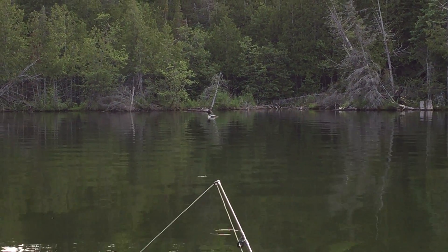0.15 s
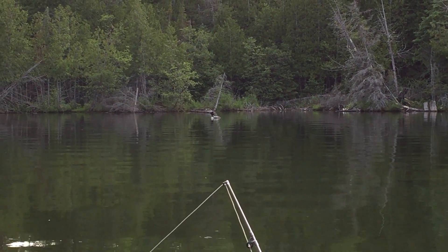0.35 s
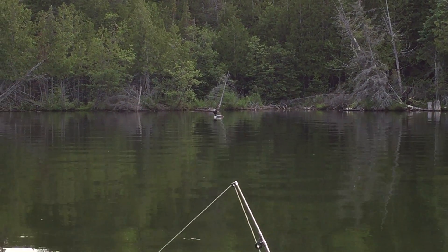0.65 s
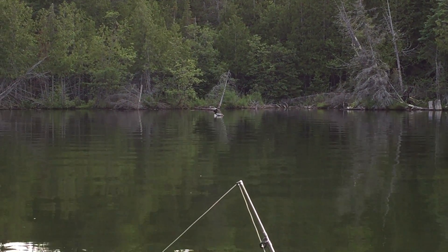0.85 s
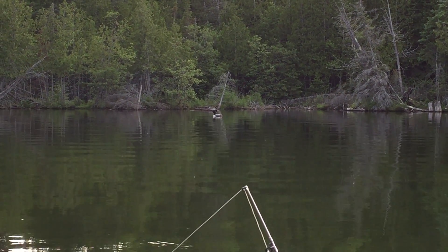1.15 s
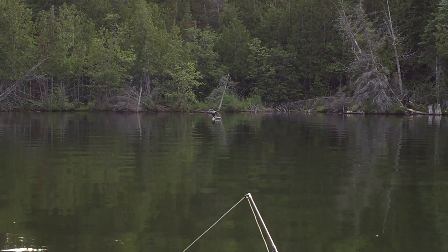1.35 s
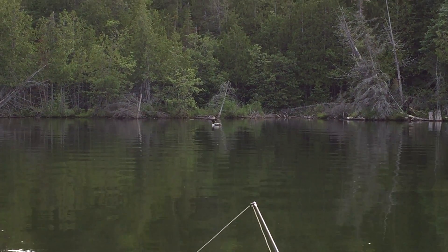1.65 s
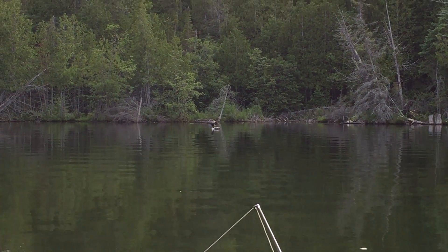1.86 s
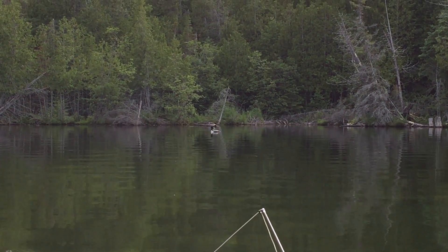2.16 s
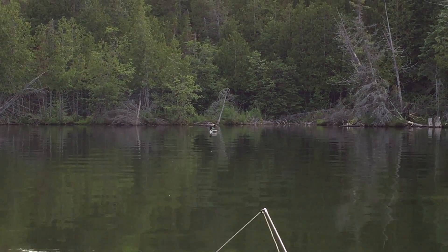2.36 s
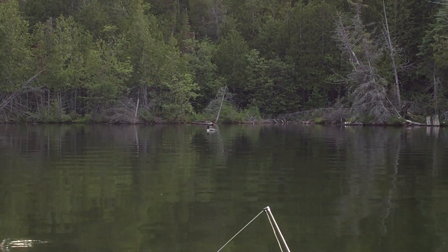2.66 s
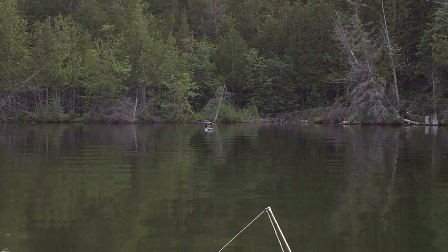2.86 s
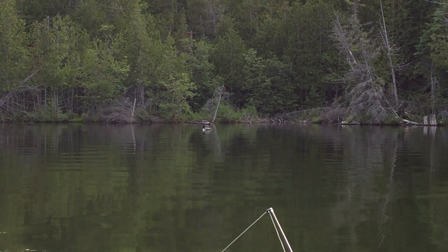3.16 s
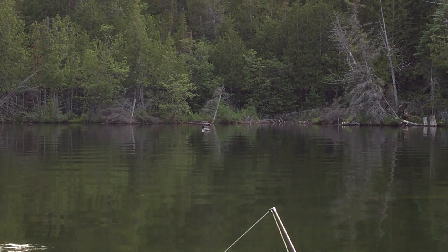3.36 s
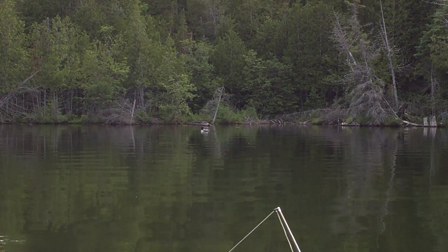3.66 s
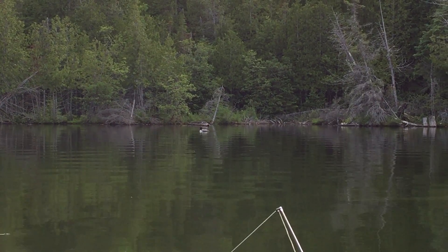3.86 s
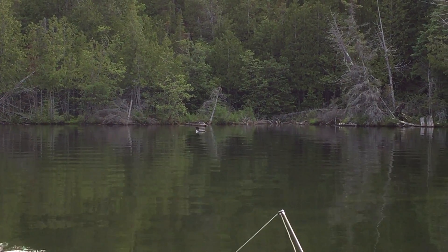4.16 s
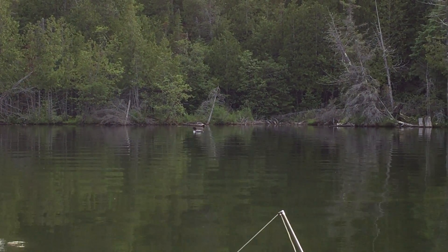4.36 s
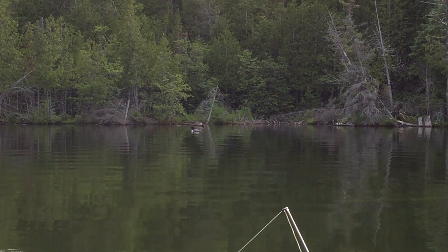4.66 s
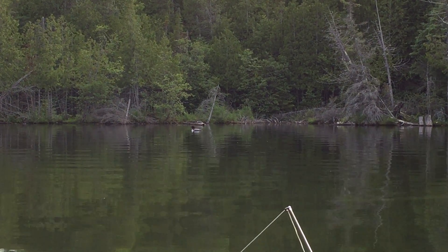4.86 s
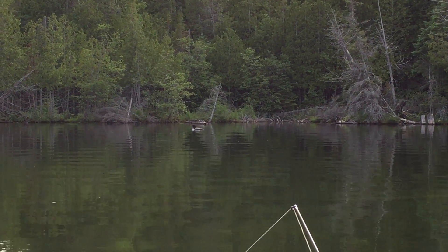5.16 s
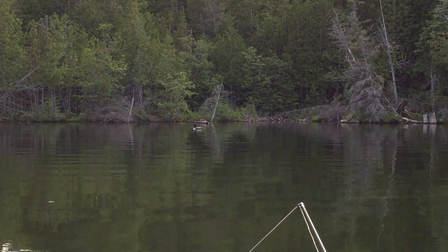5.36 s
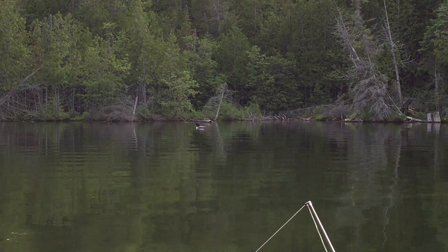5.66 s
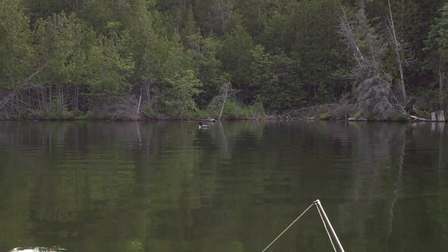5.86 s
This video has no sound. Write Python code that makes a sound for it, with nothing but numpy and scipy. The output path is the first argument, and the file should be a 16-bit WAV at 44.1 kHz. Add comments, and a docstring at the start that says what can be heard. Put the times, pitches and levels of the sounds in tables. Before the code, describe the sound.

A loon far across a still lake gives a half-second, five-pulse tremolo cry at once, its voice flipping between reedy and pure. Woods return a blurred echo. After a pause, a faint hoot and creak lead into a second, rougher cry. Later a small songbird whistles a quick, high see-saw phrase. The microphone is outdoors near the water, with low rumble, soft hiss and two tiny close ticks.

```python
"""Loon tremolo across a still lake

A loon gives two tremolo cries from far across the water, a soft hoot and a creak leading into the second.
Its voice is a stack of harmonics that flips between a low, reedy register and a high, pure one.
The wooded shore throws the cries back as scattered copies; a far shore answers faintly about a second later.
A small songbird whistles one see-saw phrase of sliding tones, with its own short echo in the trees.
Two faint ticks sound close by; under it all lie shaped noise as low rumble and soft hiss, and a faint hum.
"""
import sys
import numpy as np
from scipy import signal
from scipy.fft import rfft, irfft
from scipy.io import wavfile
from scipy.ndimage import uniform_filter1d

SR = 44100
rng = np.random.default_rng(int(sys.argv[2]) if len(sys.argv) > 2 else 0)


def wav_record(signal):
    """Record a signal, one row per channel, as 16-bit PCM in the file named by sys.argv[1]."""
    frames = np.transpose(np.atleast_2d(signal))
    bounded = np.clip(frames, -1, 1)
    # unit amplitude maps onto the largest positive 16-bit level
    quanta = np.round(bounded * 32767).astype(np.int16)
    wavfile.write(sys.argv[1], SR, quanta)


N = 264600
TIME = np.arange(N) / SR
LOW, MIDDLE, HIGH = range(3)  # the loon's registers


def undb(db):
    """Decibels to gain."""
    return 10 ** (np.asarray(db) / 20)


def unit(x):
    """Scale to rms 1."""
    return x / np.sqrt(np.mean(x ** 2))


def spectrum_gain(hz, points):
    """Gain at the given frequencies, from (Hz, dB) points joined along a log frequency axis."""
    at, db = np.transpose(points)
    return undb(np.interp(np.log(np.maximum(hz, 1)), np.log(at), db))


def colour(x, points):
    """Filter by a (Hz, dB) spectrum."""
    return irfft(rfft(x) * spectrum_gain(np.fft.rfftfreq(len(x), 1 / SR), points), len(x))


def walk(rate):
    """Random levels held 1 / rate s and slewed twice; spread 1."""
    hold = max(int(SR / rate), 1)
    steps = np.repeat(rng.standard_normal(N // hold + 1), hold)
    slewed = uniform_filter1d(uniform_filter1d(steps, hold), hold)
    return unit(slewed[:N])


def bump(t, at, rise, fall, squareness=2):
    """A smooth rise to 1 at the given time and a fall back to 0."""
    return np.exp(-np.abs((t - at) / np.where(t < at, rise, fall)) ** squareness)


def gesture(rows, start=0, size=64):
    """The samples that a table spans, a soft on-off gate, and its columns joined by smoothed lines."""
    s, *columns = np.transpose(rows)
    s = s + start
    span = np.flatnonzero((TIME >= s[0]) & (TIME <= s[-1]))
    t = TIME[span]
    to_edge = np.minimum(t - s[0], s[-1] - t)
    gate = np.sin(np.pi / 2 * np.clip(to_edge / .004, 0, 1)) ** 2  # 4 ms ramps
    return span, gate, [uniform_filter1d(np.interp(t, s, c), size) for c in columns]


def background(rumble_db=-67, hiss_db=-74, flicker_db=1.4, hum_drift=0.0093, hum_waver_db=2):
    """Still air and microphone hiss, a swelling low rumble, and the wavering hum of a distant motor."""
    # Shape of the rumble. Each row: frequency in Hz, relative level in dB.
    rumble_spectrum = [(20, -43.5), (30, -26), (42, -7), (58, -5), (78, 1), (100, -4.5), (125, -2),
                       (150, -8), (215, -7), (300, -13.5), (400, -14.5), (520, -22), (700, -48.5)]
    # Shape of the hiss. Each row: frequency in Hz, relative level in dB.
    hiss_spectrum = [(290, -28), (500, -3.5), (537, -3), (611, -0.5), (815, -5.5), (954, -2), (1450, -7),
                     (2360, -7.5), (2880, -9.5), (3480, -9.5), (4980, -14), (6450, -15), (9500, -17.5),
                     (10400, -22), (11200, -19), (15500, -22)]
    # The faint low hum. Each row: frequency in Hz, mean level in dB.
    hum_tones = [(91.2, -76), (183, -85.5)]
    # Swells of the rumble. Each row: peak in seconds, half length in seconds,
    # change in dB of the bass below 150 Hz, change in dB of the rumble above it.
    swells = [(0.062, 0.25, 2.5, 10), (0.652, .1, 7, 5.5), (.99, .04, 7, 2.5), (3.918, .22, 7, 0),
              (4.36, 0.052, 5, 2), (5.418, .15, 4.5, -1)]
    rumble = colour(rng.standard_normal(N), rumble_spectrum)
    bass = signal.sosfiltfilt(signal.butter(4, 150, fs=SR, output="sos"), rumble)
    upper = rumble - bass
    bass_db, upper_db = sum(np.outer(dbs, bump(TIME, s, half, half)) for s, half, *dbs in swells)
    rumble = bass * undb(bass_db + flicker_db * walk(23)) + upper * undb(upper_db + walk(12))

    turns = np.cumsum(1 + hum_drift * walk(4.9)) / SR  # one drift shared by all hum tones
    hum = np.zeros(N)
    for hz, db in hum_tones:
        level = np.sqrt(2) * undb(db + hum_waver_db * walk(1.5))
        hum += level * np.sin(2 * np.pi * hz * turns)

    hiss = unit(colour(rng.standard_normal(N), hiss_spectrum))
    return undb(rumble_db) * unit(rumble) + hum + undb(hiss_db) * hiss


def cry(start, end, attack_s, slack_power=1.51, size=64):
    """One tremolo cry: surges of effort lift pitch, level and overtones within the register of the moment."""
    # Surges of effort, five to a cry; squareness 2 is a bell, more flattens the crest.
    # Each row: crest in seconds, rise in seconds, fall in seconds, squareness, pitch lift in Hz,
    # then added level, second harmonic and reediness in dB.
    surge_rows = [(.066, 0.056, 0.034, 2.01, 233.8, -1, 4, -4),
                  (0.1541, 0.036, .035, 2.33, 256.4, 0.5, 4, -2),
                  (0.2524, 0.031, 0.031, 2.53, 206.3, -0.2, 1, -2.5),
                  (.357, .0344, .0336, 2.38, 200.3, -2, -0.5, -2),
                  (.475, .035, 0.027, 1.8, 215, -2.5, -5, -5.5),
                  (2.1878, 0.033, 0.044, 2.21, 182, -3.5, -1, -14),
                  (2.305, .040, .038, 2.0, 219.5, 0.5, 0, -4.5),
                  (2.3968, 0.029, .034, 2.38, 206, 2, 2, -2.5),
                  (2.5, 0.026, 0.035, 3.04, 191.2, -.5, 1, -2.5),
                  (2.6169, .030, .043, 2.62, 178.2, -1, -8.5, -8)]
    # Pitch of each register, low to high, as a ratio to the low one.
    register_ratios = [1, 1.126, 1.363]
    # Registers low to high at full effort. Each row: level, second harmonic and reediness in dB.
    register_tone = np.array([(-30, 0.25, -1), (-30, -2, -5.5), (-24, -1.9, -11)])
    # What each register loses with no effort. Each row: level, second harmonic and reediness in dB.
    register_slack = np.array([(-4.5, -23.5, -28), (-10, -47.5, -27.5), (-8.5, -29, -17.5)])
    # Flips of the voice. Each row: time in seconds, register it enters.
    flips = [(.138, MIDDLE), (.16, HIGH), (.316, LOW), (.333, MIDDLE), (.339, HIGH), (0.409, LOW),
             (2.306, MIDDLE), (2.346, LOW), (2.382, MIDDLE), (2.4, HIGH), (2.46, LOW), (2.484, MIDDLE),
             (2.493, HIGH), (2.557, LOW), (2.615, MIDDLE), (2.642, LOW)]
    # Where the voice nearly stops between surges. Each row: time in seconds, half length in seconds,
    # added level in dB.
    catches = [(2.252, .004, -11.5)]
    rest_hz, arch_hz, lowest_hz = 549.4, 139.5, 609  # pitch with no effort, mid-cry lift, floor of the low register
    release_s, flip_s, strain_s = 0.03, 0.0062, 0.011
    flip_db, strain_db = -4, 2.5
    fade_overtone_db = -16.5  # the overtones come in later than the tone and leave sooner

    span = np.flatnonzero((TIME >= start) & (TIME <= end))
    t = TIME[span]
    gate = (1 - np.exp((start - t) / attack_s)) * (1 - np.exp((t - end) / release_s))
    surges = np.array([bump(t, at, rise, fall, squareness) for at, rise, fall, squareness, *_ in surge_rows])
    lift_hz, *accents = np.array(surge_rows)[:, 4:].T @ surges
    slack = (1 - surges.max(axis=0)) ** slack_power

    register, flipping, strain = np.full(len(t), LOW), np.zeros(len(t)), np.zeros(len(t))
    for s, new_register in flips:
        register[t >= s] = new_register
        flipping = np.maximum(flipping, bump(t, s, flip_s, flip_s))
        if new_register == MIDDLE:  # strain just before leaving the low register brings out the overtones
            strain += bump(t, s - flip_s, strain_s, flip_s)

    arch = np.sin(np.pi * (t - start) / (end - start))
    low_hz = np.maximum(rest_hz + arch_hz * arch + lift_hz, lowest_hz)
    hz = low_hz * np.array(register_ratios)[register]
    tone = register_tone[register].T + slack * register_slack[register].T + accents
    db, second_db, reed_db = tone
    # the voice weakens for an instant at each flip
    db = db + flip_db * flipping + sum(depth * bump(t, s, half, half) for s, half, depth in catches)
    bright_db = strain_db * strain + fade_overtone_db * (1 - gate)
    columns = (hz, db, second_db + bright_db, reed_db + bright_db)
    return span, gate, [uniform_filter1d(c, size) for c in columns]


def loon(jitter=0.00094, shimmer_db=0.43, overtone_flutter_db=2, fade_power=0.87, reed_tilt_db=3.5,
         smear=0.18, count=11):
    """Harmonics of the syrinx slide through fixed throat resonances; at the cracks its two sides beat and rasp."""
    # The two cries. Each row: start in seconds, end in seconds, attack in seconds.
    cries = [(.019, .55, 0.01), (2.183, 2.712, .003)]
    # A soft hoot before the second cry. Each row: time in seconds, pitch in Hz,
    # then level, second harmonic and reediness in dB, all ahead of the throat.
    hoot = [(2.05, 362, -69.5, -2, -7.5), (2.075, 378, -60.5, -1, -15), (2.115, 362, -75.5, -4, -11.5)]
    # A low creak into the second cry, in the same columns: seconds, Hz, and the three levels in dB.
    creak = [(2.158, 416, -42.5, -10.5, -22), (2.186, 585, -49, -7, -27.5)]
    # Rough spots in the voice, mostly around register flips, one in the creak.
    # Each row: start in seconds, end in seconds, roughness from 0 to 1, beat in Hz.
    cracks = [(0.133, 0.162, 0.35, 250), (.328, .345, 0.15, 191), (0.476, 0.495, 0, 202.3),
              (2.158, 2.184, 0.36, 154), (2.304, 2.347, 0.63, 203.7), (2.38, 2.406, 0.7, 230.8),
              (2.48, 2.496, 0.72, 226), (2.607, 2.643, 0.53, 159.7)]
    # Resonances of throat and bill. Each row: frequency in Hz, gain in dB.
    throat = [(400, -22), (600, -7), (800, -0.5), (1200, 6.5), (1400, 0.5), (1650, 1.5), (2000, -8),
              (2460, -20.5), (2620, -31), (2760, -33), (2900, -17), (3100, -15), (3330, -11), (4000, -14.5),
              (4800, -14.5), (5200, -20.5), (5650, -14), (5950, -23.5), (6550, -21), (7050, -38),
              (9600, -39.5), (11000, -54)]
    crack_jitter, crack_beat, crack_rasp = .025, .5, .8  # pitch fraction, beat depth, phase in radians

    rough, beat_hz = np.zeros(N), np.zeros(N)
    for start, end, amount, hz in cracks:
        span, gate, _ = gesture([(start, 0), (end, 0)])
        rough[span], beat_hz[span] = amount * gate, hz
    beat_phase = 2 * np.pi * np.cumsum(beat_hz * (1 + 0.064 * walk(200))) / SR
    beat = 1 + crack_beat * rough * np.sin(beat_phase)
    waver = 1 + jitter * walk(500) + crack_jitter * rough * walk(1100)
    shimmer = shimmer_db * walk(200)

    calls = [cry(*row) for row in cries] + [gesture(hoot), gesture(creak)]
    out = np.zeros(N)
    for k in range(1, count + 1):
        flutter = overtone_flutter_db * walk(90)
        # blurs each overtone on its own
        rasp = np.log(k) * (crack_rasp * rough * walk(1000) + smear * walk(260))
        for span, gate, (hz, db, second_db, reed_db) in calls:
            phase = 2 * np.pi * np.cumsum(hz * waver[span]) / SR
            overtone_db = 0
            if k == 2:
                overtone_db = second_db
            elif k > 2:  # as the reediness falls, the highest harmonics fade first
                overtone_db = reed_db * (k / 4) ** fade_power + reed_tilt_db * np.log2(k / 4) + flutter[span]
            source = gate * beat[span] * undb(db + shimmer[span] + overtone_db)
            out[span] += source * spectrum_gain(k * hz, throat) * np.sin(k * phase + rasp[span])
    return out


def woodland_echo(x, echo, tone, wet_db, treble_loss_db, patchy_db=4.0, split_hz=2000):
    """Clumps of trunks each return weak copies; the treble dies sooner, by treble_loss_db a second."""
    delay, db = np.transpose(echo)
    lag = TIME[:2 * SR]
    strength_db = np.interp(lag, delay, db, left=-200, right=-200) + patchy_db * walk(40)[:len(lag)]
    scatter = rng.standard_normal(len(lag)) * undb(strength_db)
    scatter = colour(scatter / np.sqrt(np.sum(scatter ** 2)), tone)  # unit energy, then coloured
    low = signal.sosfiltfilt(signal.butter(4, split_hz, fs=SR, output="sos"), scatter)
    response = low + (scatter - low) * undb(-treble_loss_db * lag)
    return undb(wet_db) * signal.fftconvolve(x, response)[:N]


def ticks(decay_s=0.0054, skirt_db=-14, floor_db=-30):
    """Tiny dry clicks close by: decaying noise, each with one broad resonance."""
    # Each row: start in seconds, level at the onset in dB, centre in Hz.
    tick_rows = [(.594, -70, 8400), (3.73, -61, 5100)]
    out = np.zeros(N)
    for s, db, hz in tick_rows:
        age = np.maximum(TIME - s, 0)
        decay = (age > 0) * np.exp(-age / decay_s)
        resonance = [(hz / 2, floor_db), (hz * 0.67, skirt_db), (hz, 0), (hz * 1.1, skirt_db), (hz * 2, floor_db)]
        out += undb(db) * unit(colour(rng.standard_normal(N), resonance)) * decay
    return out


def phrase(count=7):
    """The songbird's notes as (shape, start s, level dB): even syllables that swell, then the flourish."""
    # High slur of a syllable. Each row: seconds from the syllable's start, pitch in Hz, relative level in dB.
    high_slur = [(0, 5785, -16), (.012, 4950, -11.5), (.024, 4940, -5), (.042, 5155, -1.5),
                 (.052, 5100, -3), (.061, 4860, -11)]
    # Low slur. Each row: seconds from the syllable's start, pitch in Hz, relative level in dB.
    low_slur = [(.074, 3854, -15), (.084, 4358, -15), (.094, 4596, -12), (.105, 4240, 0),
                (.116, 4110, -3.5), (.125, 3957, -35)]
    # Thin high lead-in. Each row: seconds from its own start, pitch in Hz, relative level in dB.
    lead_in = [(0, 5900, -19), (.016, 6520, -10), (.026, 5800, -1)]
    # Closing flourish. Each row: time in seconds, pitch in Hz, level in dB.
    flourish = [(4.474, 3490, -86), (4.486, 4200, -65), (4.508, 5140, -68.5), (4.526, 4200, -66),
                (4.542, 3400, -85), (4.576, 2800, -81), (4.6, 4230, -65.5), (4.616, 4720, -76),
                (4.655, 4720, -85)]
    song_start_s, syllable_s = 3.252, .1772
    swell_s = 0.17  # the shortfall from full level shrinks by a factor e in this time
    high_db, high_shortfall_db = -57.5, -25
    low_db, low_shortfall_db = -55.5, -5.5
    lead_in_ahead_s, lead_in_db = .024, -66.5

    notes = [(flourish, 0, 0)]
    for k in range(count):
        start = song_start_s + k * syllable_s
        shortfall = np.exp(-k * syllable_s / swell_s)
        notes.append((high_slur, start, high_db + high_shortfall_db * shortfall))
        notes.append((low_slur, start, low_db + low_shortfall_db * shortfall))
        if k >= count - 2:  # just ahead of the last two syllables
            notes.append((lead_in, start - lead_in_ahead_s, lead_in_db))
    return notes


def songbird(variation=0.0066):
    """Pure whistled slurs, each a hair different in pitch."""
    out = np.zeros(N)
    for shape, start, note_db in phrase():
        span, gate, (hz, db) = gesture(shape, start)
        phase = 2 * np.pi * np.cumsum(hz * (1 + variation * rng.standard_normal())) / SR
        out[span] += gate * undb(db + note_db) * np.sin(phase)
    return out


def scene():
    """Both birds with their echoes, over the quiet of the lake."""
    # Echo from the near woods. Each row: delay in seconds, relative strength in dB.
    near_echo = [(.008, -15), (.03, -5.5), (.09, -2), (0.199, -5), (.35, -14.5), (.56, -25), (.64, -45.5)]
    # What the woods send back. Each row: frequency in Hz, gain in dB.
    wood_tone = [(600, -1), (950, -1), (1200, -3), (1700, -1.5), (2000, -8), (2400, -5.5), (3400, 2.5),
                 (5000, -0.5), (9000, -12)]
    # Echo from the far shore. Each row: delay in seconds, relative strength in dB.
    far_echo = [(0.599, 1), (.9, -9), (1.15, -9.5), (1.351, -12.5)]
    # What the far shore sends back. Each row: frequency in Hz, gain in dB.
    far_tone = [(600, 1.5), (1000, -1.5), (1200, 2.5), (1700, -3.5), (3000, -24)]
    # Echo of the songbird in its tree. Each row: delay in seconds, relative strength in dB.
    leaf_echo = [(.003, 0), (.02, -1.5), (.055, -9), (.25, -36)]
    cries, song = loon(), songbird()
    woods = woodland_echo(cries, near_echo, wood_tone, wet_db=-11.0, treble_loss_db=40.5)
    far = woodland_echo(cries, far_echo, far_tone, wet_db=-38, treble_loss_db=20)
    leaves = woodland_echo(song, leaf_echo, wood_tone, wet_db=-9.5, treble_loss_db=40)
    return (background() + cries + woods + far + ticks() + song + leaves)[None]


def record(dry, top_hz=15650):
    """The recorder cuts the top with a steep low-pass."""
    return signal.sosfilt(signal.ellip(10, .2, 70, top_hz, fs=SR, output="sos"), dry)


dry = scene()
out = record(dry)
wav_record(out)
```